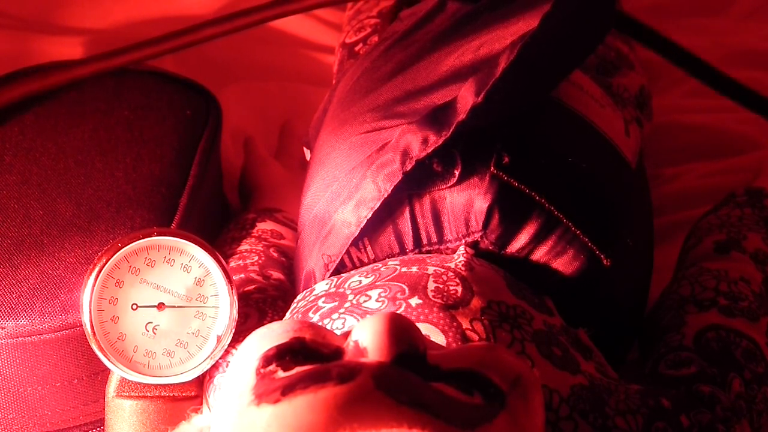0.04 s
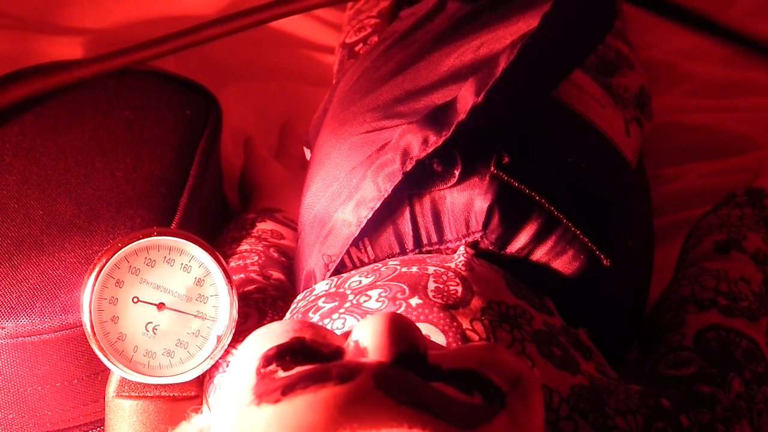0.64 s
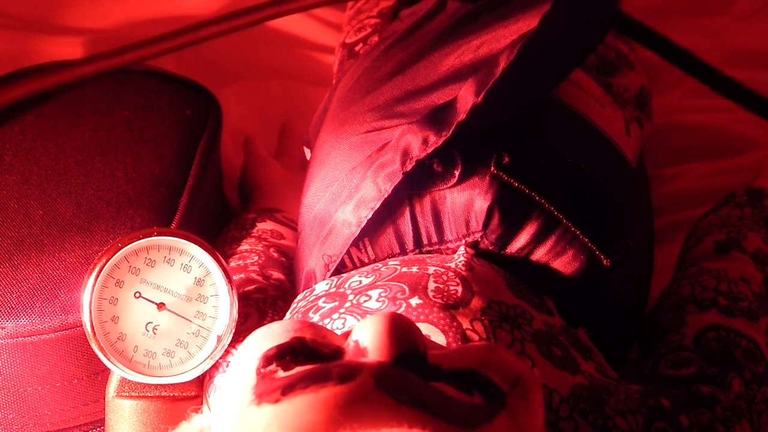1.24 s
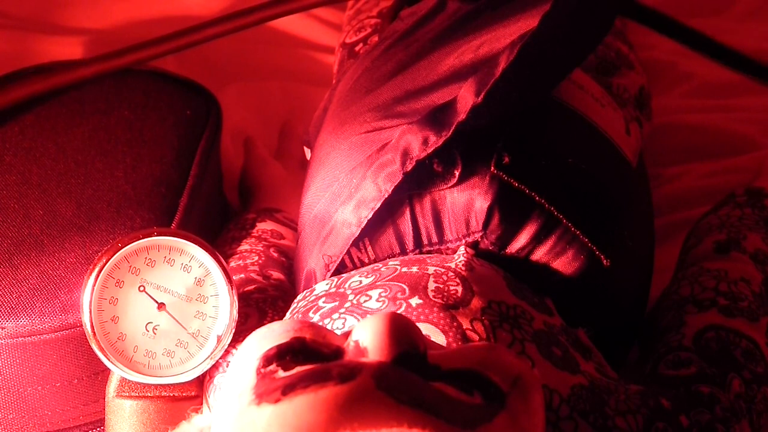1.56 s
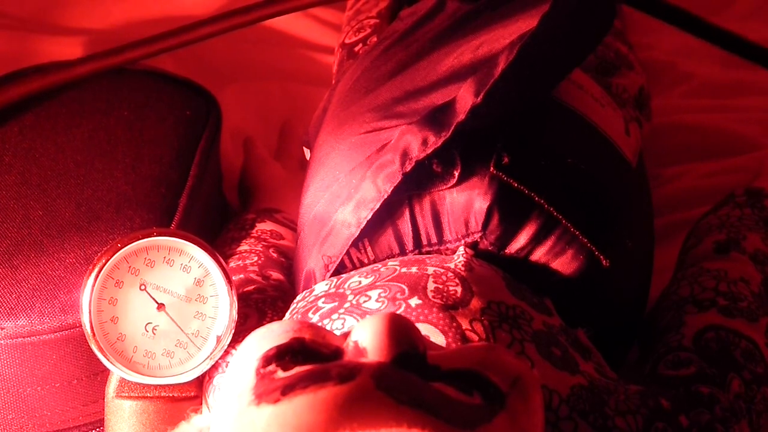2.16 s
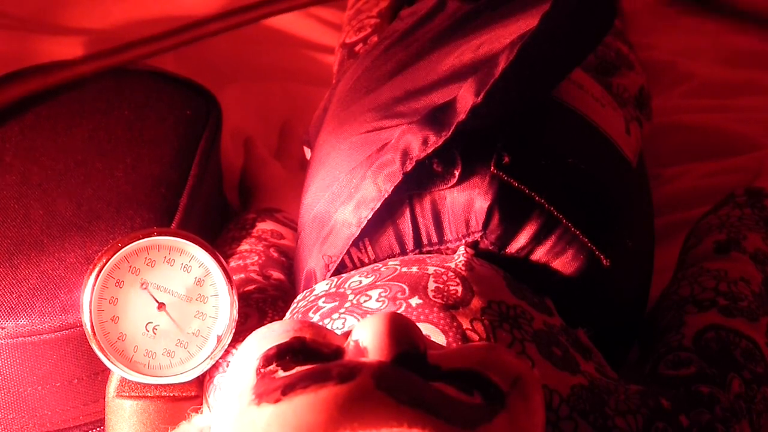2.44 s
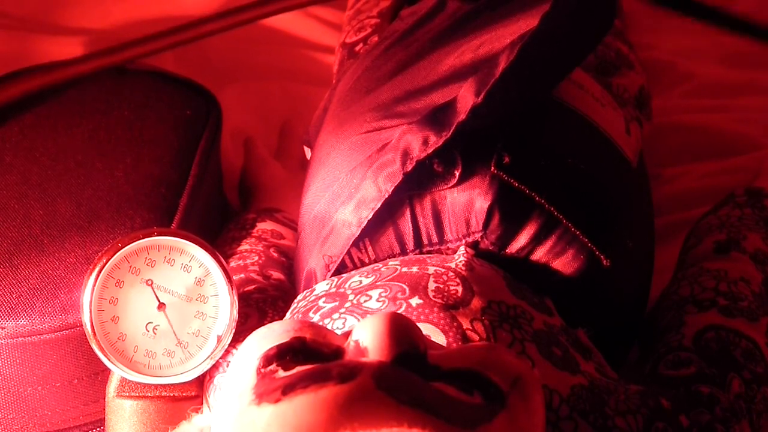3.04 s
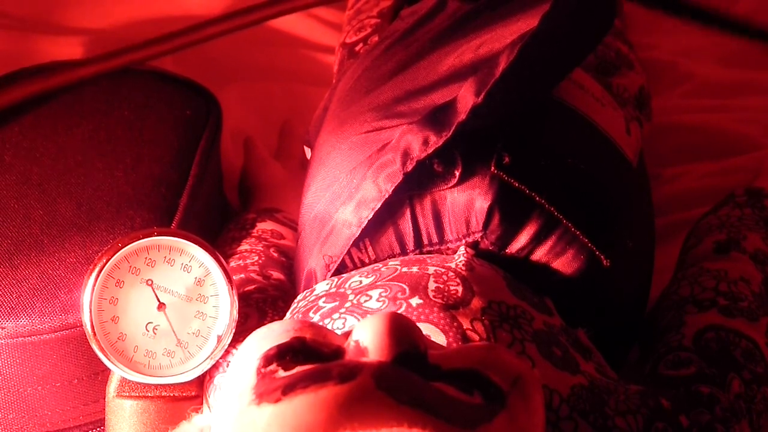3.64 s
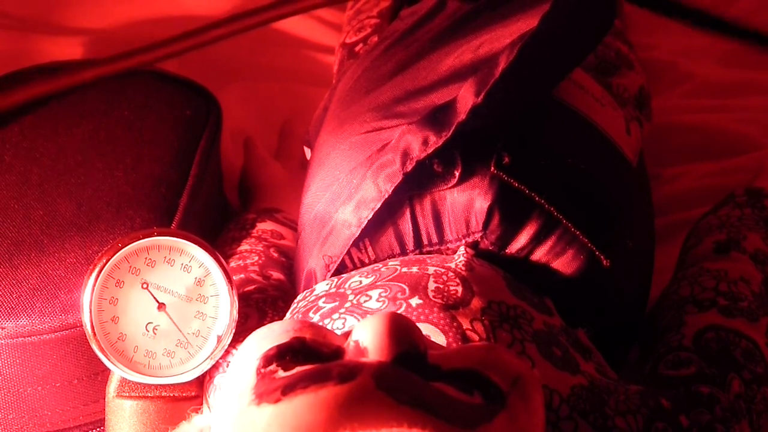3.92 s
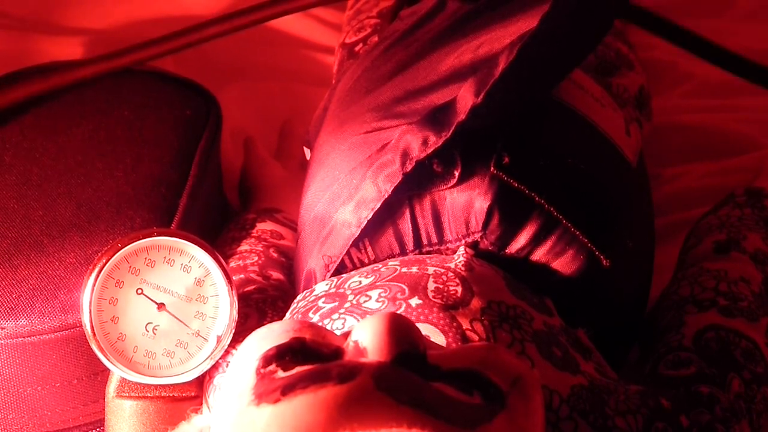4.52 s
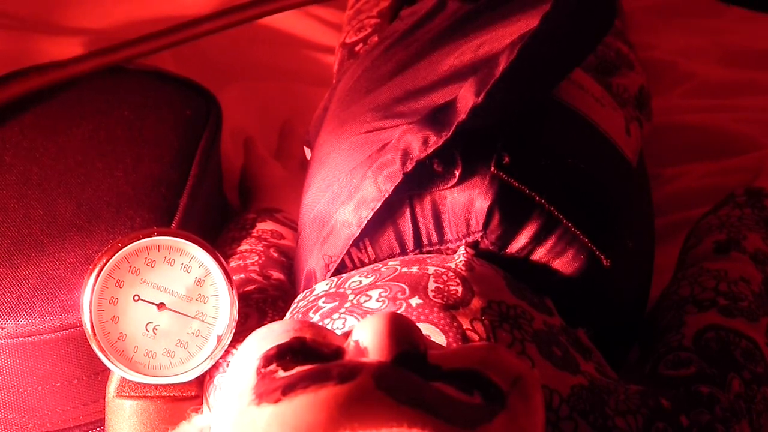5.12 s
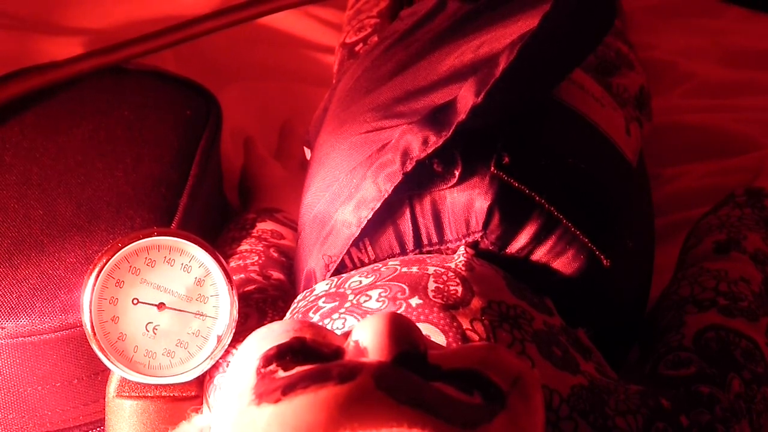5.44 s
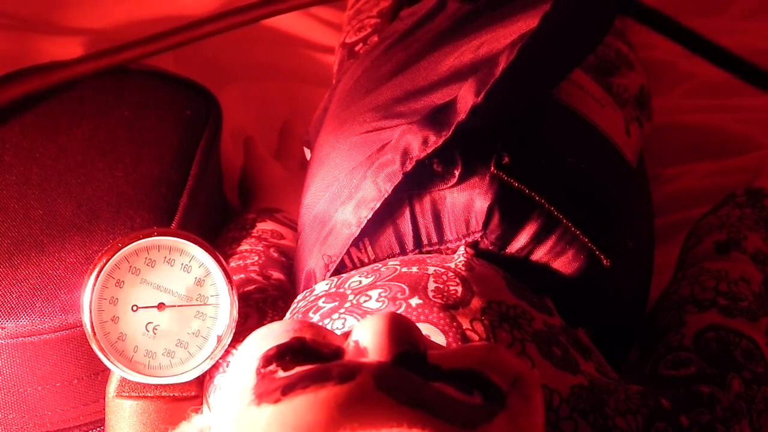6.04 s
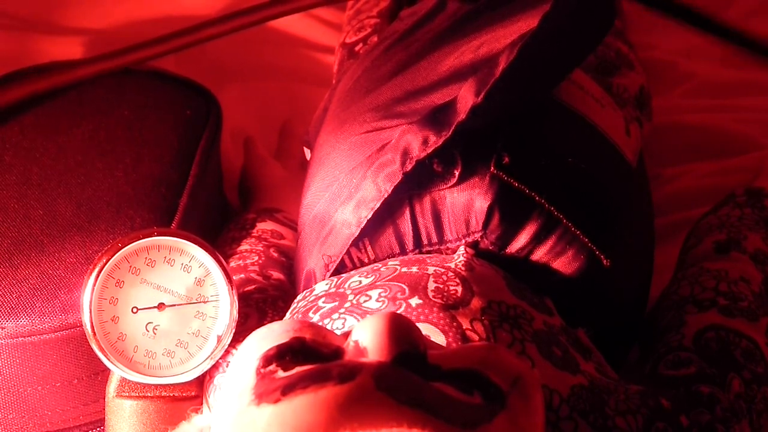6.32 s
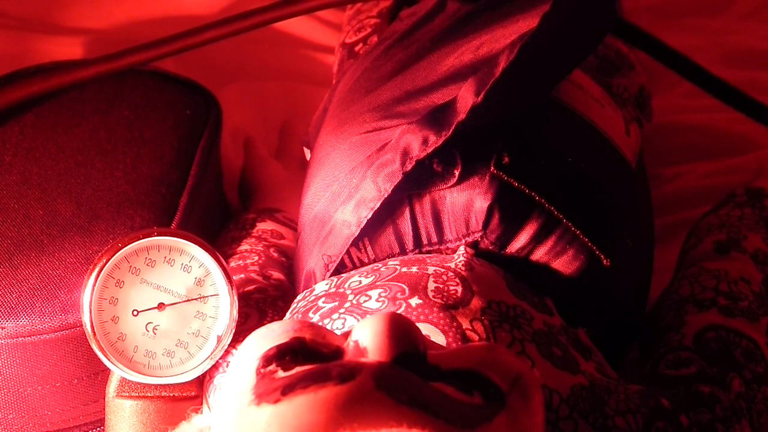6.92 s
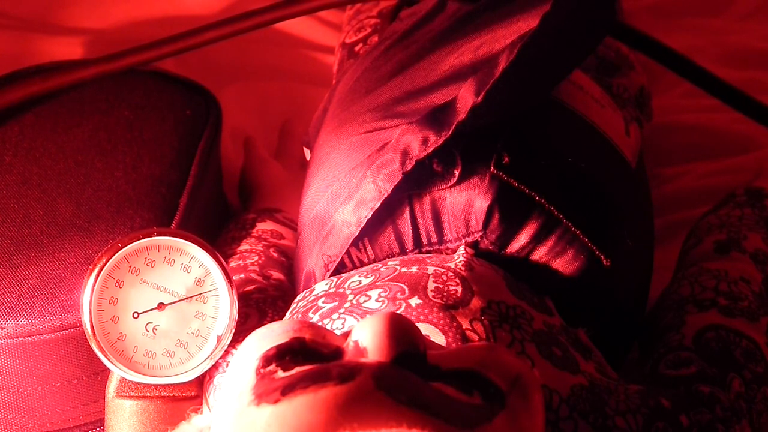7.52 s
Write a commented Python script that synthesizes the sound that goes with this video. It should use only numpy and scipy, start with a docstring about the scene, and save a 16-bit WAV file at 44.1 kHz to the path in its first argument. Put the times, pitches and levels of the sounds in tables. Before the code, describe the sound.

A rubber hand bulb pumps up a blood-pressure cuff with airy, whistling puffs, then a valve hisses faintly in a quiet room.

```python
"""A rubber hand bulb pumps up a blood-pressure cuff in a small, quiet room with a mains hum.
First the bulb springs back, drawing air through its whistling inlet valve. Seven strokes follow: the
rubber crumples, the outlet valve pops, a turbulent jet rushes into the cuff and the bulb refills.
From about 4 s the tight cuff creaks faintly while air goes on seeping from the bleed valve, which
hisses up three times as its screw is eased. Near the end the hand makes one soft bump."""
import sys
import numpy as np
from scipy import signal
from scipy.fft import rfft, irfft, next_fast_len
from scipy.io import wavfile
from scipy.ndimage import uniform_filter1d

SR = 44100
rng = np.random.default_rng(int(sys.argv[2]) if len(sys.argv) > 2 else 0)


def transcribe(signal):
    """Save signal, clipped to [-1, 1], as a 16-bit WAV file at the path in sys.argv[1]."""
    frames = np.atleast_2d(signal).T
    limited = np.clip(frames, -1, 1)
    pcm = np.round(limited * 32767).astype(np.int16)
    wavfile.write(sys.argv[1], SR, pcm)


N = 343098
T = np.arange(N) / SR

# Tabulated levels are relative: each source adds its own gain.
# The fingers dent the bulb: t/s, duration/s, rubber level/dB, air puff level/dB
DENTS = [(0.31, 0.026, -46.5, -39), (0.827, 0.035, -40.5, -36.5), (0.875, 0.016, -41, -50),
         (1.333, 0.025, -42, -34), (1.38, 0.021, -49, -49), (1.846, 0.032, -47, -42.5),
         (1.914, 0.017, -42.5, -62), (2.351, 0.024, -38.5, -39.5), (2.882, 0.03, -39.5, -35),
         (2.92, 0.028, -44.5, -51), (3.394, 0.031, -43, -39)]
# The outlet valve pops open: t/s, rush level/dB, knock level/dB, snap level/dB
SQUEEZES = [(0.399, -35, -29, -42), (0.918, -35, -27, -55), (1.422, -35, -35, -34), (1.949, -36, -27, -40),
            (2.446, -36, -34, -34), (2.968, -34, -29, -36), (3.492, -35, -25.5, -40)]
# The bulb refills: t/s, duration/s, rush level/dB, whistle level/dB, whistle lag/s,
# opening chirp level/dB, closing chirp level/dB
REFILLS = [ (0.046, .191, -40, -32.5, 0.0042, -29, -26.5), (0.594, .164, -40.5, -31, 0.0015, -37, -30.5),
           (1.111, 0.16, -41, -29.5, 0.0025, -30, -33), (1.612, 0.16, -41, -28.5, 0.0032, -38, -33),
           (2.148, 0.14, -40.5, -28.5, .001, -39, -43.5), (2.648, .179, -40.5, -31, 0.0022, -39, -31.5),
           (3.179, .148, -40.5, -35.5, .026, -46, -34), (3.688, 0.21, -40, -33.5, 0.012, -34, -37), ]


def undb(db):
    """Amplitude ratio of a level in decibels."""
    return 10 ** (np.asarray(db) / 20)


def unit(x):
    """Normalisation to rms 1."""
    return x / np.sqrt(np.mean(x ** 2) + 1e-20)


def jitter(rate_hz):
    """Random modulation of spread near 1: linear interpolation between Gaussian values."""
    knots = rng.standard_normal(N // 16)
    return np.sqrt(3 / 2) * np.interp(T * rate_hz, np.arange(len(knots)), knots)


def noise(spectrum):
    """Spectral shaping: noise of rms 1 that follows points of f/Hz, level/dB."""
    hz, db = np.transpose(spectrum)
    size = next_fast_len(N)
    f = np.fft.rfftfreq(size, 1 / SR)
    gain = undb(np.interp(np.log(f + 1), np.log(hz), db))
    return unit(irfft(rfft(rng.standard_normal(size)) * gain)[:N])


def resonance(x, hz, width_hz):
    """Forced response of a second-order resonator with gain 1 at its centre."""
    return signal.lfilter(*signal.iirpeak(hz, hz / width_hz, fs=SR), x + 1e-18)


def whistle(hz, width_hz):
    """Turbulence in a resonance: narrow-band noise of rms 1 whose centre may move."""
    lowpass = signal.butter(2, width_hz / 2, fs=SR, output="sos")
    slow = signal.sosfilt(lowpass, rng.standard_normal((2, N)))
    carrier = np.exp(2j * np.pi * np.cumsum(hz * np.ones(N)) / SR)
    return unit(np.real((slow[0] + 1j * slow[1]) * carrier))


def gain_curve(points):
    """Envelope through points of t/s, level/dB, silent outside their span."""
    times, db = np.transpose(points)
    inside = uniform_filter1d(1. * ((T >= times[0]) & (T <= times[-1])), size=128)
    return inside * undb(np.interp(T, times, db))


def bursts(times, lengths, levels_db, rise_s):
    """Envelope of transients that rise quickly, hold and die away."""
    gain = np.zeros(N)
    for start, length, db in zip(times, lengths, levels_db):
        span = slice(int(start * SR), int((start + 2 * length) * SR))
        age = T[span] - T[span][0]
        gain[span] += undb(db) * (1 - np.exp(-age / rise_s)) * np.exp(-(age / length) ** 4)
    return gain


def swell(start, length, attack_s, crest, droop_db, release_db_per_s):
    """Envelope of valve flow: onset, an arch about its crest (a share of length), exponential decay."""
    age = T - start
    arch = np.square((np.clip(age / length, 0, 1) - crest) / (1 - crest))
    opening = .5 * (1 + np.tanh(age / attack_s))
    return opening * undb(-droop_db * arch - release_db_per_s * np.clip(age - length, 0, 1))


def pan(right_db):
    """Level difference: stereo gains that put the right side right_db above the left."""
    return undb(np.array([[-right_db], [right_db]]) / 2)


def room(x, wet_db, t60_s, lag_s, shift_hz=3):
    """Reverberation: direct sound, lag_s later on the left, plus exponentially decaying reflections."""
    age = T[:SR // 4]
    echo = rng.standard_normal((2, 2, len(age))) * undb(-60 * age / t60_s) * (age > .001)
    # long waves reach both sides alike
    lowpass = signal.butter(1, 750, fs=SR, output="sos")
    echo[:, 1] += signal.sosfilt(lowpass, echo[:, 0] - echo[:, 1])
    echo *= undb(wet_db) / np.sqrt(np.sum(echo ** 2, axis=2, keepdims=True))
    first, second = signal.fftconvolve(x[None, None], echo, axes=2)[..., :N]
    # the moving hand blends two patterns of reflections
    blend = np.pi / 2 * jitter(shift_hz)
    direct = np.array([np.roll(x, int(round(lag_s * SR))), x])
    return (direct + np.cos(blend) * first + np.sin(blend) * second) / np.sqrt(1 + undb(2 * wet_db))


def background(air_db=-54.5, wide_hz=1800, waver_db=0.04):
    """Superposition of steady hum and room air, whose bass is coherent on the two sides."""
    # Mains and motor partials: f/Hz, rms level/dB
    partials = [(50, -71.5), (120, -68.5), (150, -55), (168.3, -66.5), (350, -56.5), (359.8, -63.5),
                (450, -69.5), (550, -99), (600, -74.5), (674, -69.5), (1156, -72), (1200, -82)]
    # Room air: f/Hz, level/dB
    air_spectrum = [(25, -34), (45, -7), (62, 1.5), (85, -16), (150, -9.5), (230, 2), (290, 4), (400, -1),
                    (700, -5), (840, -0.5), (950, -7), (1250, -9.5), (1750, -16), (3500, -19),
                    (10500, -18.5), (15500, -31)]
    hum = sum(np.sqrt(2) * undb(db + waver_db * jitter(3.05))
              * np.sin(2 * np.pi * (hz * T + rng.random())) for hz, db in partials)
    mid = noise(air_spectrum) * undb(.5 * jitter(6.6))
    side = signal.sosfilt(signal.butter(1, wide_hz, "high", fs=SR, output="sos"), noise(air_spectrum))
    return hum + undb(air_db) * np.array([mid + side, mid - side])


def handling(waver_hz=110):
    """The tight cuff creaks in frequency-modulated tones; the hand bumps with low-frequency noise."""
    # Cuff creaks: t/s, duration/s, level/dB, f/Hz
    creaks = [(4.412, 0.012, -58, 1780), (4.604, .014, -49, 830), (4.762, 0.0093, -56, 1780),
              (4.841, 0.009, -58, 1750)]
    # Hand bump: t/s, duration/s, level/dB
    bumps = [(7.228, 0.073, -51)]
    waver = 2 * np.pi * np.cumsum(waver_hz * jitter(500)) / SR
    creak = sum(bursts([start], [length], [db], rise_s=0.0018)
                * np.sqrt(2) * np.sin(2 * np.pi * hz * T + waver) for start, length, db, hz in creaks)
    thud = noise([(40, -17), (130, -2), (260, -5), (600, -16), (2000, -24), (8000, -55)])
    return creak + bursts(*np.transpose(bumps), rise_s=.015) * thud


def bleed_valve(seep_db=1, hiss_db=2, thin_db=2):
    """Jet noise of cuff air escaping past the screw: the narrower the gap, the higher the hiss."""
    # The constant seep and the first hiss: t/s, level/dB
    seep_levels = [(0, -56.5), (3.9, -51), (4.3, -54), (5.5, -57), (6.1, -60), (6.7, -61), (7.3, -62.5),
                   (7.78, -63)]
    hiss_levels = [(4.96, -62), (5.038, -48), (5.134, -48.5), (5.316, -41), (5.4, -71)]
    # Two thin hisses as the screw is eased: t/s, duration/s, level/dB
    easings = [(5.62, 0.16, -46.5), (5.898, 0.16, -47.5)]
    # Spectra of the three jets: f/Hz, level/dB
    seep_spectrum = [(1500, -7), (3500, -4.5), (5200, -2.5), (7200, 0), (10500, 3.5), (13000, -2),
                     (15500, -10.5)]
    hiss_spectrum = [(2000, -23), (3500, -13), (5500, -7.5), (7000, -1.5), (8200, 3.5), (9800, -4),
                     (12000, -11), (15500, -22)]
    thin_spectrum = [(3000, -18), (5000, -7.5), (8000, 0), (10800, 2), (13000, 2), (15500, -8.5)]
    seep = undb(seep_db) * gain_curve(seep_levels) * noise(seep_spectrum)
    hiss = undb(hiss_db) * gain_curve(hiss_levels) * noise(hiss_spectrum)
    eased = sum(undb(db) * swell(at, length, attack_s=0.058, crest=0.59, droop_db=2, release_db_per_s=220)
                for at, length, db in easings)
    thin = undb(thin_db) * eased * noise(thin_spectrum)
    return seep + (hiss + thin) * undb(1.3 * jitter(60))


def cupped_hand(x, hz=2560, width_hz=420, lift_db=-2):
    """Cavity resonance of the hand round the bulb, heard on the right, where it opens."""
    return np.array([x[0], x[1] + undb(lift_db) * resonance(x[1], hz, width_hz)])


def wall(force, popped=False):
    """Modal response of the rubber wall; a dent and a valve pop weight the modes differently."""
    # Wall modes: f/Hz, bandwidth/Hz, level when dented/dB, level when popped/dB
    modes = [(301, 67, -5.5, 0), (420, 123, 2.5, 0), (734, 90, -4.5, 5), (1260, 660, -9, -10)]
    return sum(undb(pop_db if popped else dent_db) * resonance(force, hz, width_hz)
               for hz, width_hz, dent_db, pop_db in modes)


def rubber(knock_db=1, knock_delay_s=0.00208, snap_s=0.0039, tick_s=0.0051, dent_trim_db=-1, grain_db=2):
    """Friction and impact excite the bulb's wall; the valve flap snaps and the grip ticks."""
    # Light ticks as the grip slackens: t/s, level/dB
    ticks = [(0.562, -44), (2.6, -34), (3.13, -36.5), (3.648, -40)]
    tick_at, tick_db = np.transpose(ticks)
    dent_at, dent_s, dent_db, _ = np.transpose(DENTS)
    pop_at, _, peak_db, snap_db = np.transpose(SQUEEZES)
    # a dent is a run of small slips
    slips = noise([(100, -36), (250, 4.5), (1500, -8.5), (5000, -10)]) * undb(grain_db * jitter(300))
    pressing = bursts(dent_at, dent_s, dent_db + dent_trim_db, rise_s=.001)
    dent = wall(slips * pressing) / np.std(wall(slips))
    # a pop is one soft blow, just after the flap snaps
    blows = np.zeros(N)
    blows[((pop_at + knock_delay_s) * SR).astype(int)] = undb(peak_db)
    knock = wall(uniform_filter1d(blows, size=12), popped=True)
    knock *= undb(knock_db + peak_db.max()) / np.abs(knock).max()
    snap = bursts(pop_at, np.full(len(pop_at), snap_s), snap_db, rise_s=0.00053)
    snap *= noise([(120, -22), (500, 10), (1400, 1), (2300, 8), (3200, 4), (4500, -30), (14000, -30)])
    tick = bursts(tick_at, np.full(len(ticks), tick_s), tick_db, rise_s=0.002)
    tick *= noise([(1500, -17), (6000, 18), (14000, -17)])
    return dent + knock + snap + tick


def squeeze(rush_db=2, tube_hz=2980, tube_db=-15):
    """Turbulent flow through the outlet valve, coloured by a resonance of the tube."""
    # Outlet jet: f/Hz, level/dB
    jet_spectrum = [(250, -25), (500, -8.5), (780, -5), (1000, -16), (1330, -4), (1600, -7.5), (2100, -3),
                    (2950, -3), (3350, -0.5), (5800, 1), (8400, 2), (9500, 6), (11500, -2.5), (14000, -17),
                    (15500, -29)]
    flow = sum(undb(db) * swell(at, 0.1, attack_s=0.0073, crest=.55, droop_db=7.5, release_db_per_s=220)
               for at, db, *_ in SQUEEZES)
    # a small puff escapes first, before the inlet seals
    dent_at, dent_s, _, puff_db = np.transpose(DENTS)
    flow += bursts(dent_at, dent_s, puff_db, rise_s=0.024)
    air = noise(jet_spectrum) + undb(tube_db) * whistle(tube_hz, width_hz=290)
    return undb(rush_db) * flow * air * undb(1.3 * jitter(220))


def flap_chirps(open_hz=12300, open_s=0.0132, open_fall=0.19, open_lead_s=0.0044,
                close_hz=9900, close_s=.013, close_fall=0.058, trim_db=1, rough_db=3, waver_hz=300):
    """Flow-induced vibration: the nearly shut flap sings a falling note as a refill begins and ends."""
    chirps = np.zeros(N)
    waver = waver_hz * jitter(900)
    for start, length, *_, open_db, close_db in REFILLS:
        opens = start - open_lead_s, open_s, open_hz, open_fall, open_db
        settles = start + length, close_s, close_hz, close_fall, close_db
        for at, lasts, hz, fall, db in opens, settles:
            progress = np.linspace(0, 1, int(lasts * SR))
            span = slice(int(at * SR), int(at * SR) + len(progress))
            phase = 2 * np.pi * np.cumsum(hz * (1 + fall * (.5 - progress)) + waver[span]) / SR
            chirps[span] += undb(db + trim_db) * np.sin(np.pi * progress) * np.sin(phase)
    return chirps * unit(undb(rough_db * jitter(700)))


def suction():
    """Envelope of the inflow under elastic recoil: it fades once the bulb is round again."""
    return sum(undb(db) * swell(at, length, attack_s=0.0081, crest=0.28, droop_db=7, release_db_per_s=230)
               for at, length, db, *_ in REFILLS)


def singing():
    """Envelope of the whistle: slower to build if it catches late, early to fade as suction drops."""
    return sum(undb(db) * swell(at + lag, length, attack_s=0.0011 + lag, crest=0.046,
                                droop_db=17, release_db_per_s=350)
               for at, length, _, db, lag, *_ in REFILLS)


def refill(rush_db=7, wall_db=-14, neck_hz=2980, neck_db=-7,
           whistle_hz=9300, whistle_db=1, waver_hz=130, sag_hz=2200, crest=0.28, flutter_db=3,
           upper_hz=13400, upper_db=-14,
           hollow_hz=2520, hollow_fall_hz=350, hollow_db=-7.5, hollow_step_db=2.5, hollow_fade_db=7):
    """Flow-excited resonance: the recoiling bulb sucks air past its fluttering, whistling inlet flap."""
    # Inlet jet: f/Hz, level/dB
    jet_spectrum = [(300, -15), (700, -11.5), (1400, -6.5), (2100, -3.5), (3400, -2), (4300, 1),
                    (5800, -0.5), (7300, 6), (8600, 10), (10300, 4), (12000, -4.5), (13100, 1), (14200, -7),
                    (15500, -25)]
    start, length, _, _, lag, _, _ = np.transpose(REFILLS)
    stroke = np.maximum(np.searchsorted(start, T) - 1, 0)
    filled = np.clip((T - start[stroke]) / length[stroke], 0, 1)
    # the pitch climbs with the suction, crests later when it catches late, and sags as it fades
    sag = sag_hz * np.square(filled - crest - (lag / length)[stroke])
    bend = waver_hz * (jitter(60) + jitter(14)) - sag
    tone = unit(whistle(whistle_hz + bend, width_hz=520) * undb(flutter_db * jitter(260)))
    upper = undb(upper_db) * whistle(upper_hz + bend + 380 * jitter(35), width_hz=400)
    # valve neck and bulb hollow colour the rush; the hollow grows louder each stroke as the cuff hardens
    neck = undb(neck_db) * (1 - filled) * whistle(neck_hz, width_hz=100)
    hollow = whistle(hollow_hz + hollow_fall_hz * np.square(1 - filled), width_hz=430)
    strokes_left = stroke.max() - stroke
    hollow *= undb(hollow_db - hollow_step_db * strokes_left - hollow_fade_db * np.square(filled))
    # the wall rumbles as it unfolds
    rumble = noise([(100, -46), (280, 2), (600, -2), (1500, -37), (6000, -50)])
    rumble *= undb(wall_db) * (1 - filled)
    rush = undb(rush_db) * noise(jet_spectrum) * undb(0.96 * jitter(200))
    return suction() * (rush + upper + neck + hollow + rumble) + undb(whistle_db) * singing() * tone


def scene():
    """Direct and reverberant fields: the bulb is close; the bleed valve points away and sounds diffuse."""
    inlet = room(refill() + flap_chirps(), wet_db=-1, t60_s=0.13, lag_s=.000023)
    outlet = room(squeeze() + rubber() + handling(), wet_db=0.5, t60_s=.11, lag_s=.000045)
    escape = room(bleed_valve(), wet_db=7, t60_s=0.076, lag_s=.0002)
    bulb = cupped_hand(pan(right_db=1) * inlet + pan(right_db=-0.4) * outlet)
    return bulb + pan(right_db=-1.6) * escape + pan(right_db=1.73) * background()


def record(dry, bass_cut_hz=32, top_cut_hz=15700):
    """Band limiting: a high-pass removes the deepest bass, a steep low-pass the highest treble."""
    thinned = signal.sosfilt(signal.butter(4, bass_cut_hz, "high", fs=SR, output="sos"), dry)
    return signal.sosfilt(signal.ellip(10, .2, 80, top_cut_hz, fs=SR, output="sos"), thinned)


dry = scene()
out = record(dry)
transcribe(out)
```